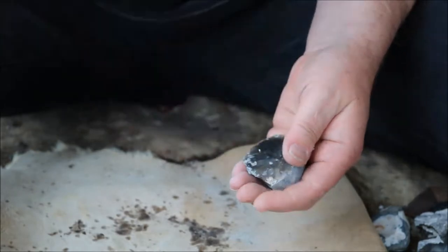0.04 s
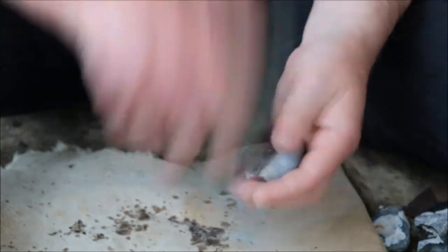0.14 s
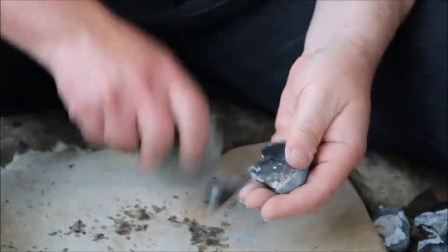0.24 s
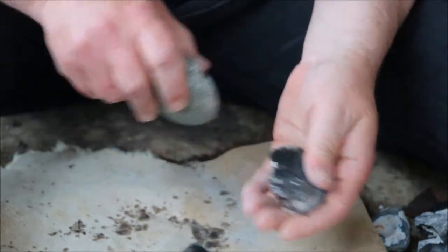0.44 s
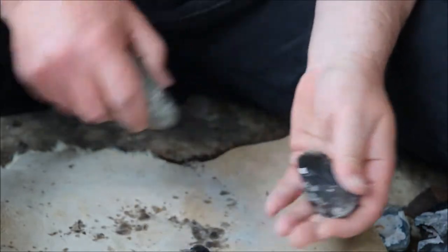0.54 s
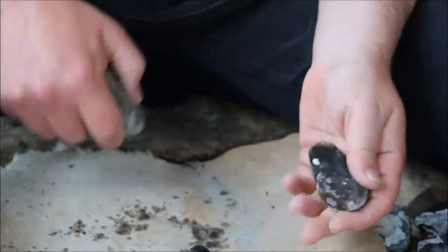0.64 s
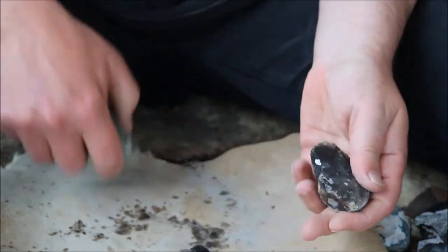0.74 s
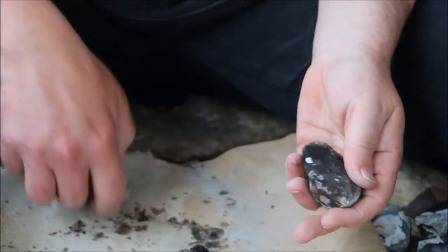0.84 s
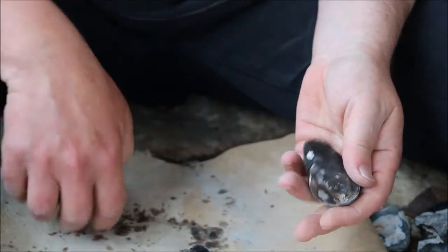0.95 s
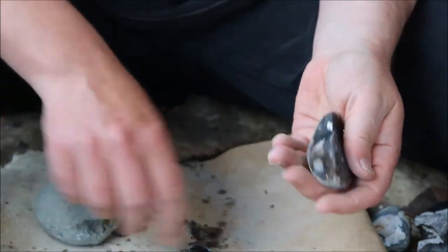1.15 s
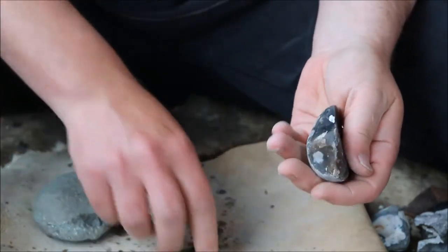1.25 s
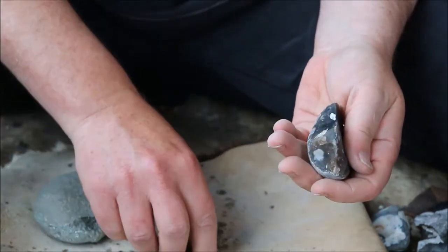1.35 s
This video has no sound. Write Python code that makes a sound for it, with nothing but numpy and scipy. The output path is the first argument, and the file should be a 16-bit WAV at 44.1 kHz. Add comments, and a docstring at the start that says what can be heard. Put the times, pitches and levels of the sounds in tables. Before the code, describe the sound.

A hammerstone hits flint with one sharp, bright crack, close by in a hard-walled room that echoes briefly. Chips tick onto a hide mat, then a hand rustles, sets the stone down with soft knocks and clinks the flake.

```python
"""Over faint room air and a thin electronic whine, a hammerstone cracks a flake off a flint core.
The stones ring briefly and hard walls throw the blow back; a limiter ducks under it, so the
room's tail swells as the gain returns. Chips land, with two knocks on a hide mat. A hand rustles
over the mat, sets the stone down with scrapes and knocks, and last picks at the ringing flake."""
import sys
import numpy as np
from scipy import signal
from scipy.fft import rfft, irfft
from scipy.io import wavfile

SR = 44100
rng = np.random.default_rng(int(sys.argv[2]) if len(sys.argv) > 2 else 0)


def transcribe(signal):
    """Save signal, clipped to [-1, 1], as a 16-bit WAV file at the path in sys.argv[1]."""
    frames = np.atleast_2d(signal).T
    limited = np.clip(frames, -1, 1)
    pcm = np.round(limited * 32767).astype(np.int16)
    wavfile.write(sys.argv[1], SR, pcm)


N = 61739

# Colour of the room air and microphone hiss: freq_hz, gain_db
AIR_COLOUR = [(25, -12.5), (55, 5.5), (90, -8), (200, -8.5), (350, -8), (600, -13.5), (1050, -13),
              (9200, -22), (15400, -29.5)]
# How alike the air is left and right: freq_hz, correlation
AIR_STEREO = [(60, 0.65), (240, 0.33), (950, .2), (3800, 0.028), (15000, .01)]
# Whine of camera electronics: pitch_hz, level_db
WHINE_TONE = [(15590, -74)]
# Colour of the fracture: freq_hz, gain_db
CRACK_COLOUR = [(150, -39), (300, -16), (800, -14), (1100, -8), (1600, -7), (2450, -0.5), (3300, -1.5),
                (4700, 4.5), (6500, 2.5), (8500, -1.5), (11000, -9.5), (15500, -17.5)]
# Ring of core and hammerstone: pitch_hz, level_db, t60_s
STONE_MODES = [(2614, -5.5, 0.0072), (3830, -5.5, 0.0041), (4740, 2, 0.0035), (5590, -11.5, 0.0061),
               (6587, 4.5, 0.0041), (8220, -4.5, .011), (9040, -1.5, 0.0052)]
# Reflections off hands and ground: delay_s, left_db, right_db
NEAR_ECHOES = [(.0006, -18, -52), (.0011, -24, -12), (.0027, -8, -26)]
# Reflections off the walls: delay_s, left_db, right_db
WALL_ECHOES = [(.0092, -11, -23), (.0116, -10, -8), (.0131, -5, -6), (.0168, -13, -12), (.022, -19, -17),
               (.026, -18, -17)]
# The room's tail: freq_hz, t60_s, gain_db
TAIL_BANDS = [(147, 1, 2), (507, 1, -4.5), (1190, 0.77, 2.96), (2480, 0.69, 4.36), (5130, 0.72, 1.9),
              (9140, .55, 2), (13600, .4, 1.5)]
# How alike the tail is left and right: freq_hz, correlation
TAIL_STEREO = [(60, 0.38), (180, 0.84), (550, 0.94), (1650, 0.33), (4970, -0.074), (15000, -0.56)]
# Chips landing: start_s, peak_db, centre_hz, width_hz, t60_s
CHIP_HITS = [(0.3712, -3.5, 9940, 7400, 0.009), (.653, -19.5, 6800, 8300, 0.017)]
# Knocks on the mat: start_s, body_peak_db, relative_grit_db, relative_thud_db
MAT_KNOCKS = [(.373, -21.5, 3, -7), (0.38, -24.5, 5, 6.5), (0.924, -43.5, 0, -1), (1.043, -39, -1.5, -11),
              (1.046, -33.5, 5.5, 0.5), (1.066, -31, -6, 0.5), (1.1325, -31.5, -14, -12),
              (1.147, -27, -6.5, -20), (1.176, -46.5, 9.5, -16), (1.201, -38.5, -25, -22),
              (1.361, -33, -2, -34), (1.373, -35, 1, -16), (1.394, -45, 5, 19.5)]
# Body of a knock: centre_hz, width_hz, gain_db
MAT_BANDS = [(640, 300, 0), (900, 380, -3), (2300, 800, -9), (3400, 900, -11)]
# Gritty top of a knock: centre_hz, width_hz, gain_db
GRIT_BANDS = [(3780, 7500, 5.5), (6940, 7600, 14), (13400, 2600, -31)]
# Swell and fade of the hand's rustle: time_s, level_db
RUSTLE_LEVELS = [(0.84, -61.5), (0.968, -55.5), (1.098, -56.5), (1.216, -62), (1.4, -60)]
# Colour of the rustle: freq_hz, gain_db
RUSTLE_COLOUR = [(59, -63), (100, -3), (236, 8.5), (304, 5.5), (407, 6), (962, 5), (1920, -3.5),
                 (2860, -0.5), (15000, -12.5)]
# Stone dragged on the mat: start_s, peak_db
STONE_DRAGS = [(0.986, -45), (0.997, -49)]
# Fingers catching the flake: start_s, level_db
FLAKE_PICKS = [(1.3483, -36), (1.3708, -35), (1.374, -38), (1.3775, -38)]
# Ring of the flake: pitch_hz, level_db, t60_s
FLAKE_MODES = [(8540, 0, .016), (9300, -5, .009), (7900, -9, .009), (13100, 0, .02), (13700, -6, .012),
               (6000, -10, .01)]

BLOW_S, BLOW_DB = .2004, 21  # level ahead of the room and limiter
AIR_DB, TAIL_DB, TAIL_RISE_S, RING_SEND_DB = -57.5, -.5, .004, -18.5
GRAINS_PER_S, GRAIN_SPREAD_DB, RUSTLE_FADE_S = 6000, 2, .029
SCATTER_T60_S, WALL_CUTOFF_HZ = .005, 10000
LIMIT_DB, SENSE_S, ATTACK_S, RELEASE_DB_PER_S, TOP_HZ = -16, .0062, .0045, 136, 15800


def amp(db):
    """Decibels to amplitude."""
    return 10 ** (np.asarray(db) / 20)


def unit_rms(x):
    """The sound scaled to an RMS of 1."""
    return x / np.sqrt(np.mean(x ** 2) + 1e-20)


def curve(points, hz, column=1):
    """One column of a table, interpolated over log frequency."""
    table = np.transpose(points)
    return np.interp(np.log(hz + 1), np.log(table[0] + 1), table[column])[:, None]


def add(mix, start_s, sound):
    """Lay a sound into the mix."""
    part = mix[..., round(start_s * SR):][..., :sound.shape[-1]]
    part += sound[..., :part.shape[-1]]


def track(hits):
    """A mono track from (start_s, level_db, sound) hits."""
    out = np.zeros(N)
    for start_s, db, sound in hits:
        add(out, start_s, amp(db) * sound)
    return out


def stereo_noise(correlation, gain):
    """Noise partly shared by left and right, shaped by gain(freq_hz, time_s)."""
    frames, hz = N // 128 + 5, np.fft.rfftfreq(512, 1 / SR)
    a, b, c, d = rng.standard_normal((frames, 257, 4)).T
    shared = np.clip(curve(correlation, hz), -1, 1)
    left = a + 1j * b
    right = shared * left + np.sqrt(1 - shared ** 2) * (c + 1j * d)
    spectra = np.array([left, right]) * gain(hz, np.arange(frames) * 128 / SR)
    return signal.istft(spectra, nperseg=512, noverlap=384)[1][:, :N]


def room_tone():
    """A steady bed of air and microphone hiss, with a thin electronic whine on top."""
    hiss = unit_rms(stereo_noise(AIR_STEREO, lambda hz, t: amp(curve(AIR_COLOUR, hz))))
    (hz, db), = WHINE_TONE
    return amp(AIR_DB) * hiss + amp(db) * np.sqrt(2) * np.sin(2 * np.pi * hz * np.arange(N) / SR)


def crack():
    """The flint fractures in one bright click, its energy packed at the front (minimum phase)."""
    log_gain = np.log(amp(curve(CRACK_COLOUR, abs(np.fft.fftfreq(2048, 1 / SR)))[:, 0]))
    click = np.fft.ifft(np.exp(np.conj(signal.hilbert(log_gain)))).real[:1024]
    return track([(BLOW_S, BLOW_DB, click / abs(click).max())])


def flint_ring(modes, strikes):
    """Struck stone rings in fast-dying sines at each (start_s, level_db), with the lows rolled off."""
    t = np.arange(3000) / SR
    ring = sum(amp(db - 60 * t / t60) * np.sin(2 * np.pi * hz * t) for hz, db, t60 in modes)
    ring /= abs(ring).max()
    rings = track((s, db, ring) for s, db in strikes)
    return signal.lfilter(*signal.butter(2, 1500, "high", fs=SR), rings)


def early_reflections(x):
    """Direct sound, crisp bounces off hands and ground, and duller scatter off rough walls."""
    taps, t = np.zeros((2, 2048)), np.arange(300) / SR
    for s, left_db, right_db in WALL_ECHOES:
        scatter = rng.standard_normal((2, 300)) * amp(-60 * t / SCATTER_T60_S)
        scatter[:, 0] = 4  # the mirror-like bounce
        scatter /= np.linalg.norm(scatter, axis=1, keepdims=True)
        add(taps, s, amp([[left_db], [right_db]]) * scatter)
    taps = signal.lfilter(*signal.butter(2, WALL_CUTOFF_HZ, fs=SR), taps)
    taps[:, 0] = 1  # direct sound
    for s, left_db, right_db in NEAR_ECHOES:
        taps[:, round(s * SR)] += amp([left_db, right_db])
    return signal.oaconvolve(x[None], taps, axes=1)[:, :N]


def room_tail(x):
    """Diffuse reverb from the hard walls; the highs die first."""
    tail = stereo_noise(
        TAIL_STEREO, lambda hz, t: amp(curve(TAIL_BANDS, hz, column=2) - 60 * t / curve(TAIL_BANDS, hz)))
    tail *= 1 - np.exp(-(np.arange(N) / SR / TAIL_RISE_S) ** 2)
    return signal.fftconvolve(x[None], amp(TAIL_DB) * tail / np.linalg.norm(tail[0]), axes=1)[:, :N]


def resonate(x, hz, width_hz):
    """One resonance, with a gain near 1 at its centre."""
    radius = np.exp(-np.pi * width_hz / SR)
    return 2 * signal.lfilter([1 - radius], [1, -radius * np.exp(2j * np.pi * hz / SR)], x).real


def contact(bands, t60_s):
    """A tap and a dying puff of noise through steep (centre_hz, width_hz, gain_db) bands, peak 1."""
    t = np.arange(2000) / SR
    puff = rng.standard_normal(len(t)) * amp(-60 * t / t60_s)
    puff[0] = 4  # the tap of first contact
    x = sum(amp(db) * resonate(resonate(puff, hz, width), hz, width) for hz, width, db in bands)
    x = signal.lfilter(*signal.butter(2, 200, "high", fs=SR), x)
    return x / abs(x).max()


def chips():
    """Chips land with short, bright ticks."""
    return track((s, db, contact([(hz, width, 0)], t60)) for s, db, hz, width, t60 in CHIP_HITS)


def knocks(thud_hz=300, thud_width_hz=220):
    """Stone meets the hide mat: a damped body with a low thud, and grit on top."""
    out = np.zeros(N)
    for s, db, grit_db, thud_db in MAT_KNOCKS:
        body = contact(MAT_BANDS + [(thud_hz, thud_width_hz, thud_db)], t60_s=.008)
        grit = contact(GRIT_BANDS, t60_s=.012)
        add(out, s, amp(db) * (body + amp(grit_db) * grit))
    return out


def rustle():
    """Dense grains of skin and grit on the mat, fading in as the hand arrives."""
    grains = amp(GRAIN_SPREAD_DB * np.minimum(rng.exponential(1, N), 4)) * rng.standard_normal(N)
    grains *= rng.random(N) < GRAINS_PER_S / SR
    colour = amp(curve(RUSTLE_COLOUR, np.fft.rfftfreq(N, 1 / SR))[:, 0])
    texture = unit_rms(irfft(rfft(grains) * colour, N))
    t = np.arange(N) / SR
    times, db = np.transpose(RUSTLE_LEVELS)
    fade_in = np.clip((t - times[0]) / RUSTLE_FADE_S, 0, 1)
    return texture * amp(np.interp(t, times, db)) * fade_in


def scrapes(centre_hz=2830, width_hz=900):
    """The stone drags on the mat with a brief rasp."""
    return track((s, db, contact([(centre_hz, width_hz, 0)], t60_s=.052)) for s, db in STONE_DRAGS)


def scene():
    """All sources in the room; the flint's ring stays close, with only a little sent to the tail."""
    noises = crack() + chips() + scrapes() + knocks() + rustle()
    core_ring = flint_ring(STONE_MODES, [(BLOW_S, BLOW_DB - 2)])
    flake_clinks = flint_ring(FLAKE_MODES, FLAKE_PICKS)
    rings = core_ring + flake_clinks
    return early_reflections(noises + rings) + room_tail(noises + amp(RING_SEND_DB) * rings) + room_tone()


def record(dry):
    """A limiter grabs late, so the crack overloads, then lets go steadily; a steep high cut follows."""
    sense, attack = np.exp(-1 / (SENSE_S * SR)), np.exp(-1 / (ATTACK_S * SR))
    power_db = 10 * np.log10(signal.lfilter([1 - sense], [1, -sense], (dry ** 2).mean(0)) + 1e-12)
    release_db = np.arange(N) * RELEASE_DB_PER_S / SR
    held_db = np.maximum.accumulate(power_db + release_db) - release_db
    duck_db = signal.lfilter([1 - attack], [1, -attack], np.maximum(held_db - LIMIT_DB, 0))
    ducked = np.clip(dry / amp(duck_db), -1, 1)
    high_cut = signal.firwin(511, TOP_HZ, window=("kaiser", 9), fs=SR)
    return signal.oaconvolve(ducked, high_cut[None], "same")


dry = scene()
out = record(dry)
transcribe(out)
```